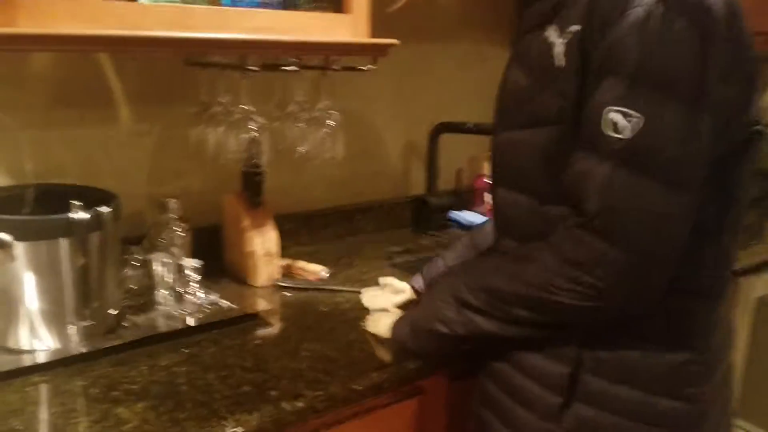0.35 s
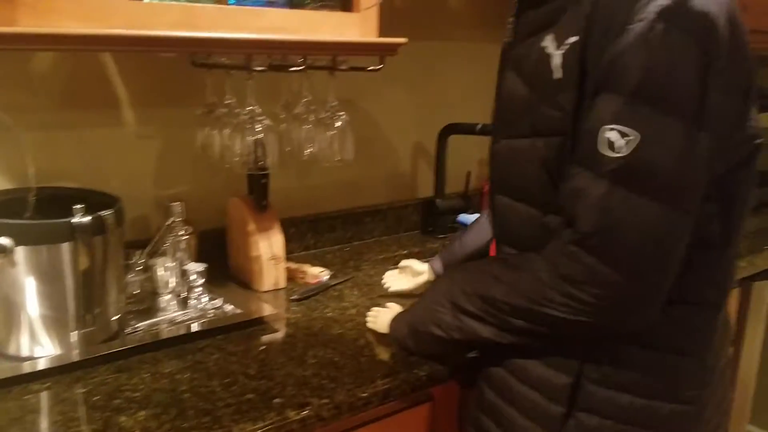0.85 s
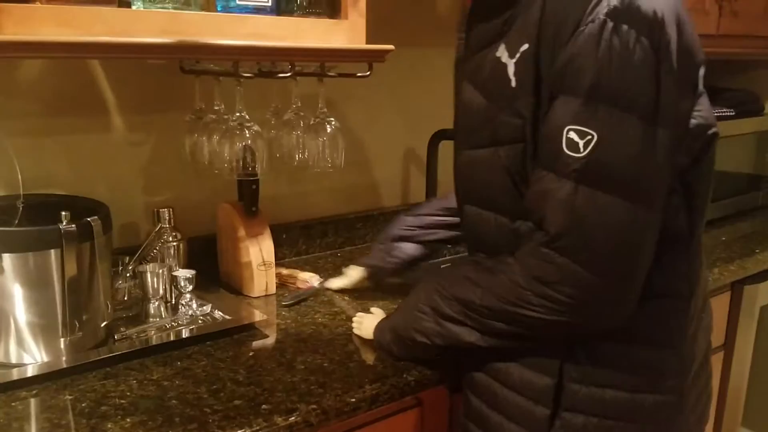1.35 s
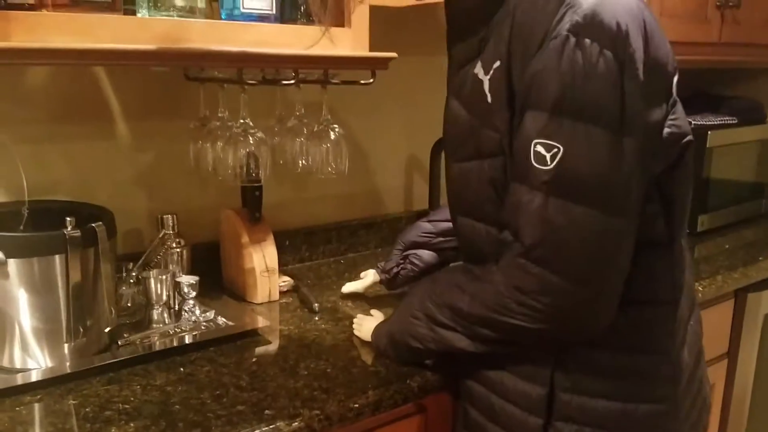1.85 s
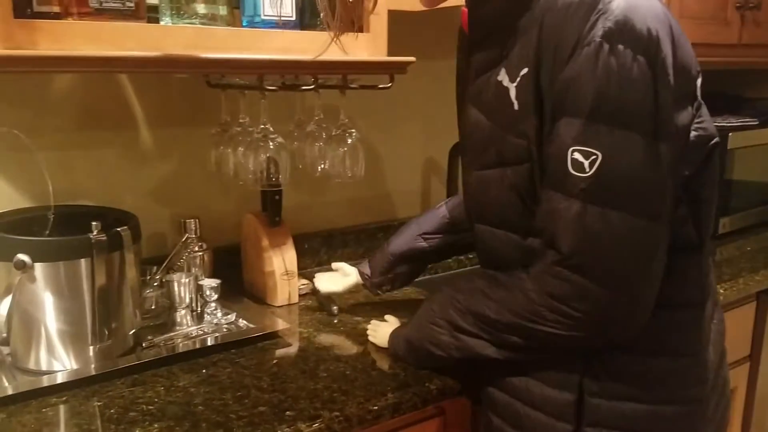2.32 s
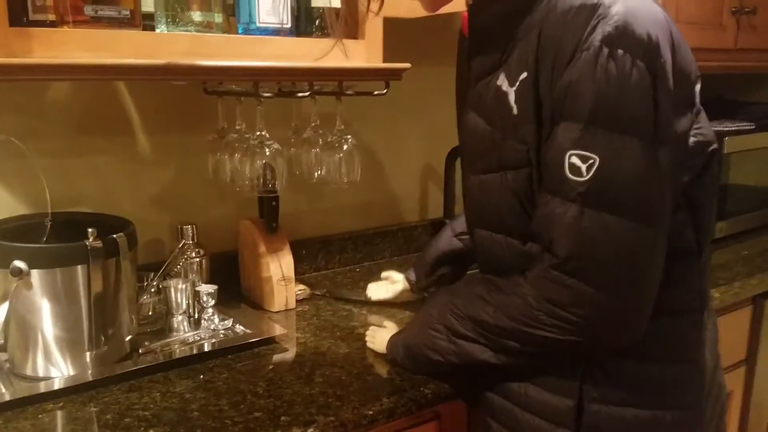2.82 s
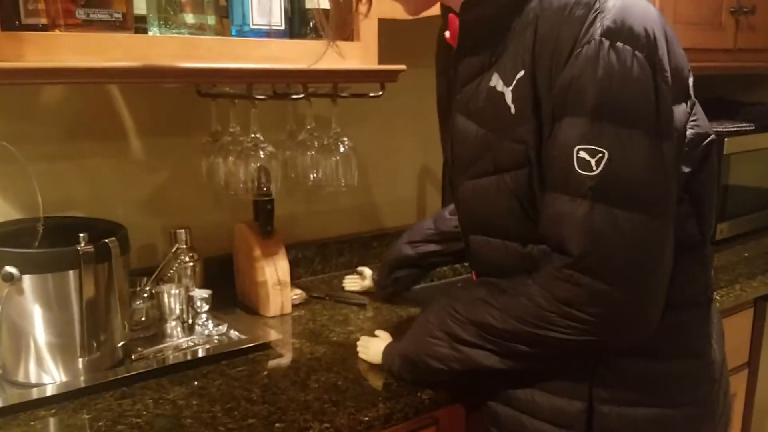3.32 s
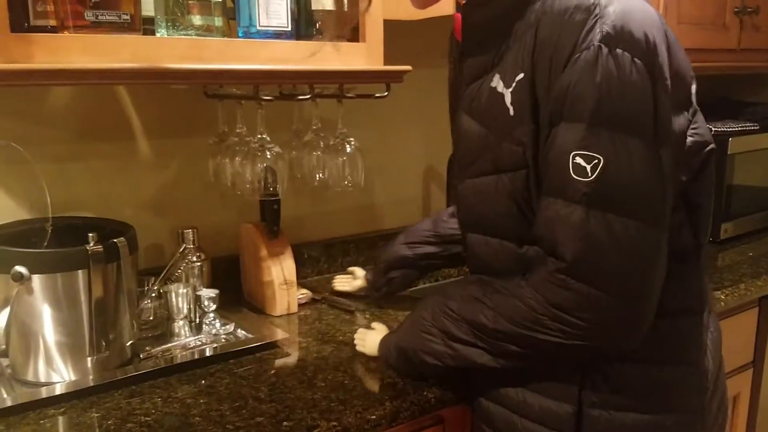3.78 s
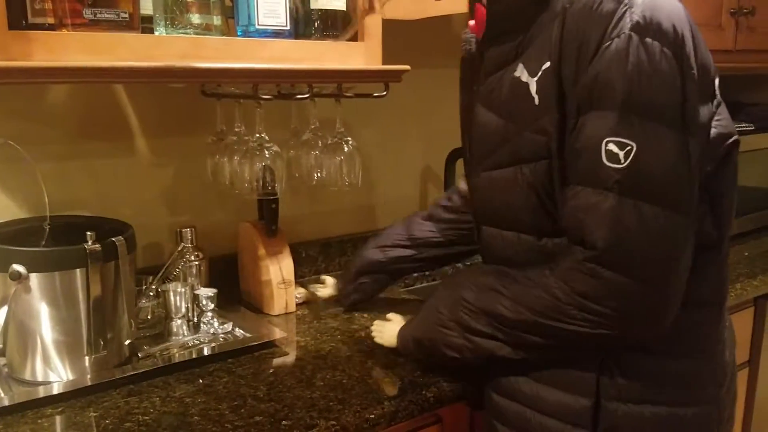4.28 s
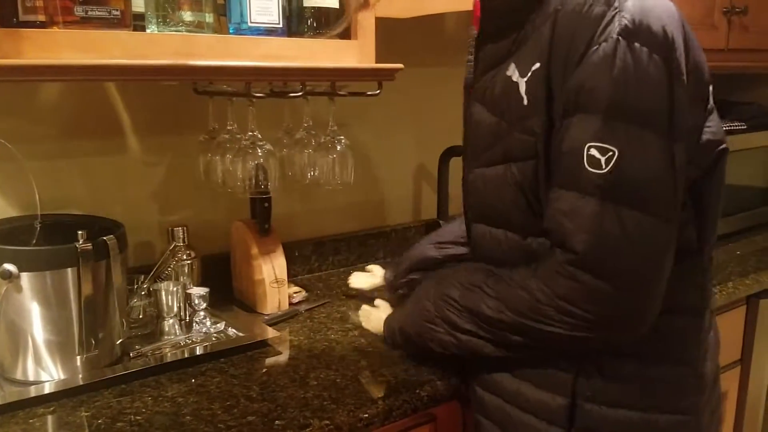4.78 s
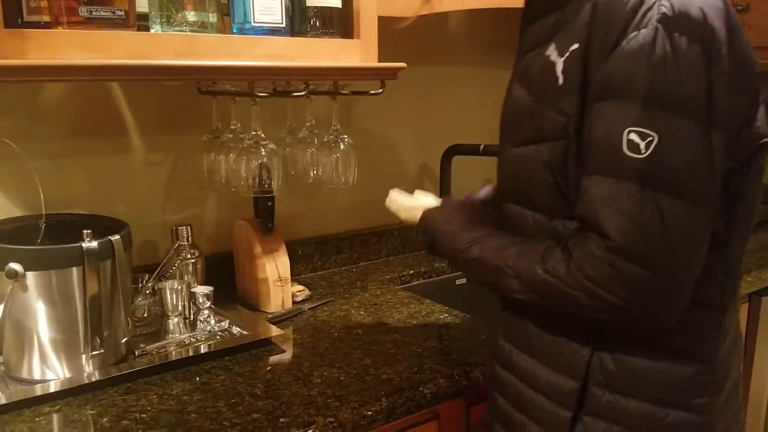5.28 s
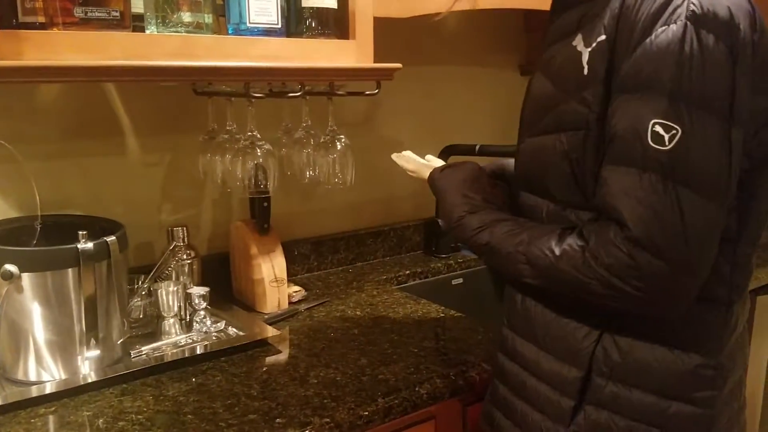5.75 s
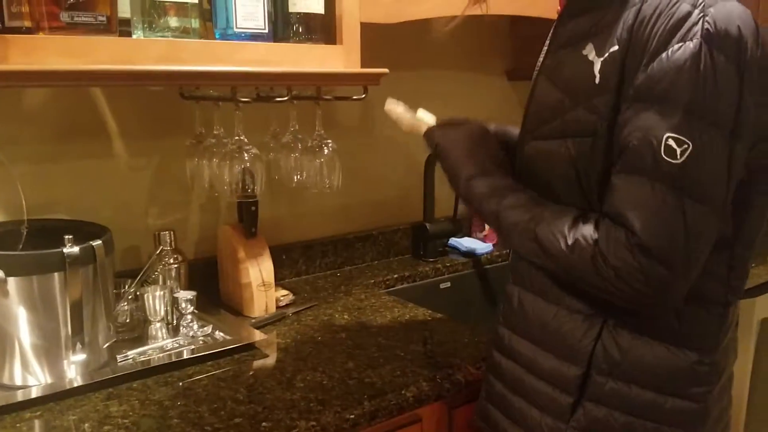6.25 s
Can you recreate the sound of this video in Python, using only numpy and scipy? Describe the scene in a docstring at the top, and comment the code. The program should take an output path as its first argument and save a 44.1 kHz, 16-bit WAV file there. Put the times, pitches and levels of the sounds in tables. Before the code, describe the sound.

Faint room tone and a jacket rustle, then a sharp rattle of steel on stone, scraping and settling. After a pause it clatters again, then twice more with harder knocks, stuttering slides and plastic crackle, the final burst longest and rough. Low bumps travel through the cabinet. It ends in light taps and nylon swishes, heard from a short distance in a lively little room.

```python
"""Quiet kitchen: a knife is nudged about on a stone counter, a couple of metres from a phone.
Each knock is a dying chatter of contacts that rings handle, blade and crackly film; between knocks the knife
slides and catches, driving the same resonances from noise. Cabinet bumps are short damped sines; a nylon sleeve
hisses as swelling filtered noise; a small hard room adds a short noise tail over a faint noise floor."""
import sys
import numpy as np
from scipy import signal
from scipy.fft import rfft, irfft, next_fast_len
from scipy.io import wavfile
from scipy.ndimage import uniform_filter1d

SR = 44100
rng = np.random.default_rng(int(sys.argv[2]) if len(sys.argv) > 2 else 0)


def persist_wave(psi):
    """Save psi, clipped to +-1, as 16-bit WAV."""
    counts = np.round(np.clip(psi, -1, 1) * 32767).astype(np.int16)
    wavfile.write(sys.argv[1], SR, np.atleast_2d(counts).T)


def makeup_ratio(level_db):
    """Linear amplitude ratio for a level in decibels (20 dB per factor of ten)."""
    decades = np.asarray(level_db, float) / 20
    return 10 ** decades


N = 281181
T = np.arange(N) / SR

# knocks, drive of each part: (time [s], blade [dB], then against the blade: main ring [dB],
# film crackle [dB], handle [dB])
KNOCKS = [(0.417, -34.5, 3.5, 17, -9.5), (0.495, -39, -16, -20, 3.5), (0.51, -35.5, -3, -24, 7),
          (0.594, -49.5, 18, 6, 4), (.61, -18, 5, -6.5, 0.5), (.624, -21.5, 8.5, -4, -21),
          (0.655, -24, 7.5, -1, 0), (0.718, -30.5, -4, -9, -9.5), (.744, -41, 10, 3, 2),
          (.764, -30, 5.5, -0.5, -9), (.808, -38, -10, -12, 8), (0.861, -40.5, -20, -17, 10),
          (0.934, -55, -6, -7, 16), (.959, -65, 12, -9, 11), (.998, -65, -13, -4, 19),
          (1.081, -84, -4, -5, 33.5), (1.178, -44, 10, -14.5, 1), (1.223, -55, 7.5, -6, -4.5),
          (1.422, -73, -5, 19, 4), (1.461, -22, 9, -1.5, -6.5), (1.483, -22, -29, 3.5, -10.5),
          (1.511, -26, -9, 4, -12), (1.551, -37.5, 15, 14, 10), (1.596, -24, -20, -2.5, -13.5),
          (1.627, -33.5, 15, -10, 4), (1.653, -37, 12, 1, 8.5), (1.675, -32, -10, -22, 1.5),
          (1.704, -23.5, -7, -14.5, -8.5), (1.736, -43.5, 14.5, -3, 7), (1.767, -39.5, -6, -26, 4),
          (2.477, -22.5, 6, -7.5, -1), (2.514, -21, 8, -4.5, 3), (2.531, -25.5, -10, -16, -1.5),
          (2.545, -18.5, 5.5, -7.5, -0.5), (2.599, -35, 8, -15, -5), (2.692, -63.5, -2, 11, 22.5),
          (2.756, -61, 9, -22, 7), (2.787, -42.5, 0.5, -2, -2), (2.838, -56.5, -1, -22, 18.5),
          (2.883, -46, -10, 7.5, -17), (2.929, -57, 5, 22, -5), (2.938, -26.5, 2.5, 6.5, 2.5),
          (3.013, -63, 28, -4, 13), (3.024, -39.5, -2, 11.5, -20), (3.052, -28, 6, -25, 4),
          (3.07, -28, 1, 0, -2), (3.132, -36.5, 10, -14, -4.5), (3.275, -48.5, 9, -18, 2.5),
          (3.311, -63, 26, -1, 12), (3.357, -64, 1, -6, 24), (3.447, -66.5, 21, -7, 22),
          (3.498, -48, 23, 5.5, 16), (3.52, -15, 7.5, -7, 0), (3.554, -22, -16, -2.5, -6),
          (3.59, -25.5, -26, -1, -9), (3.65, -31.5, -23, -1, -17), (3.674, -39, -26, -12, -28),
          (3.703, -30.5, -19, 5.5, -20), (3.768, -38.5, -5, -18, -2), (3.828, -44.5, -5, -5, -4),
          (3.863, -34.5, -14, 2, -14), (3.915, -56, 0, -2, 11.5), (4.161, -39.5, 5, -17, -2.5),
          (4.185, -59, 21.5, -2, 9.5), (4.221, -73, 12, 14, 10.5), (4.321, -51.5, -1, 9, -16.5),
          (4.357, -19.5, 9, 1, -1), (4.368, -15.5, -3, -20, -10), (4.394, -17, 3, -3, -4.5),
          (4.453, -30, 6, -15, -3), (4.476, -24, 9.5, -7, -13.5), (4.504, -22.5, 2, -9.5, -15.5),
          (4.611, -37, 19.5, -8, 5), (4.626, -19.5, -33, 1, -18.5), (4.658, -46, -19, -7.5, 6),
          (4.69, -26.5, -2, 9, -12), (4.726, -23, 6, -11, -5), (4.802, -36, -22, -13.5, 12),
          (4.857, -46.5, 3, -14, 19), (4.937, -61, 20.5, -8, 24), (4.987, -55, -16.5, -14, 18),
          (5.021, -61, -9, -10, 24.5), (5.088, -77, -0.5, 0, 20.5), (5.357, -53, 19, 8, 1),
          (5.381, -46, 7.5, -9, 1), (5.571, -57.5, -14, -10, -7.5)]
# one list per sliding stroke: (time [s], handle [dB], crackle against handle [dB], favoured handle mode [Hz])
SLIDE = [
    [(.4, -65, 8, 834), (.472, -53, 11, 990), (.594, -48.5, -7.5, 920), (.662, -37, -1.5, 1340),
     (.736, -33, -12, 1230), (.79, -41.5, -22, 1420), (.84, -50.5, -9.5, 1440), (.908, -43, -22, 1480),
     (.94, -59, -27, 790), (.99, -76, -12, 1410), (1.12, -70, 3.5, 1410), (1.21, -68, 5.5, 1240),
     (1.3, -66, 0, 730)],
    [(1.44, -70, 12, 1300), (1.52, -61, 19, 1000), (1.6, -34.5, -14, 1140), (1.65, -32, -13, 1320),
     (1.694, -36.5, -32, 1310), (1.768, -49.5, -12, 1100), (1.82, -60, -6.5, 1006),
     (1.95, -100.5, -0.5, 900)],
    [(2.53, -65, 5, 1180), (2.65, -35.5, -11, 1030), (2.72, -49.5, -25, 850), (2.89, -52.5, -4.5, 950),
     (3.01, -31.5, -19, 960), (3.14, -46, -9, 880), (3.31, -45.5, -5.5, 780), (3.41, -46.5, -9.5, 730),
     (3.5, -44.5, -11, 1140)],
    [(3.56, -46, 13, 1080), (3.68, -68, 21.5, 950), (3.74, -50, 9, 930), (3.78, -47, -17, 975),
     (3.86, -49.5, -10, 930), (3.91, -58.5, -10, 874), (3.99, -59, -14.5, 864), (4.12, -79, -18.5, 1150)],
    [(4.27, -98, 3, 1090), (4.34, -47, -17, 1090), (4.41, -54, 20.5, 1060), (4.52, -29, 5, 1060),
     (4.57, -38, -3, 1040), (4.63, -62.5, 17, 1010), (4.76, -23, -23.5, 1320), (4.84, -43.5, -20, 1420),
     (4.9, -39.5, -27, 1320), (4.97, -51.5, -22, 1060), (5.02, -54.5, -20, 518), (5.12, -91.5, 7, 545)],
]
# the hand: (time [s], grip as dull rattle against clear ringing [dB], favoured blade mode [Hz],
# favoured film mode [Hz])
HAND = [(.4, 4.5, 2470, 12600), (.5, 7.5, 3050, 11000), (.58, -4.5, 2600, 6900), (.74, 0.5, 3030, 7260),
        (.9, -3.5, 2340, 8300), (1.25, 0, 2700, 5840), (1.45, 10, 2600, 8200), (1.54, 12, 3530, 8250),
        (1.78, -6, 2554, 7600), (2.47, -6, 3220, 7600), (2.62, -2.5, 2900, 6400), (2.91, 1, 3450, 9900),
        (3.05, 0.5, 2350, 12000), (3.17, 1, 2650, 6140), (3.45, -1.5, 2720, 6100), (3.72, 14, 3960, 8200),
        (3.78, -4, 2380, 8000), (3.88, 6, 4300, 7700), (4.14, -6, 3020, 6980), (4.4, 6.5, 3290, 8100),
        (4.68, 11.5, 3700, 7000), (4.75, -0.5, 2260, 6500), (4.87, -2, 2450, 8050), (5.02, -12, 2400, 8800),
        (5.35, -1, 3086, 8430)]


def band(x, hz, width_hz):
    """Resonance with gain 1 at its centre."""
    return signal.lfilter(*signal.iirpeak(min(hz, .45 * SR), hz / max(width_hz, 5), fs=SR), x)


def colour(x, points):
    """Gain of (frequency [Hz], level [dB]) points, joined on a log-frequency axis."""
    size = next_fast_len(N)
    hz, db = np.transpose(points)
    bin_hz = np.arange(size // 2 + 1) * SR / size
    gain = makeup_ratio(np.interp(np.log(bin_hz + 1), np.log(hz), db))
    return irfft(rfft(x, size) * gain, size)[..., :N]


def unit(x):
    """Scale to rms 1."""
    return x / np.sqrt(np.mean(x ** 2))


def walk(rate_hz):
    """Normal random levels drawn at rate_hz, joined by straight slews."""
    hold = int(SR / rate_hz)
    levels = np.repeat(rng.standard_normal(N // hold + 1), hold)
    return uniform_filter1d(levels, hold)[:N]


def floor():
    """Room tone and microphone hiss: flickering coloured noise, narrow in the deep bass, wider in the treble."""
    # noise spectrum: (frequency [Hz], relative density [dB per Hz])
    floor_spectrum = [(15, -36), (25, -6.5), (80, -12.5), (97, -15.5), (145, -12.5), (236, -14.5),
                      (263, -15.5), (363, -15), (607, -16.5), (734, -13.5), (1260, -20), (1560, -15.5),
                      (4490, -22.5), (14800, -23), (16000, -22.5)]
    # stereo width: (frequency [Hz], side minus mid [dB])
    side_levels = [(60, -17.5), (110, -33), (200, -4), (380, -8), (700, -7.5), (1290, -10), (2380, -4),
                   (4400, -5.5), (8120, -1), (15000, -5)]
    mid_rms_db, flicker_db, flicker_hz = -66.5, 0.56, 9.8
    mid, side = colour(rng.standard_normal((2, N)), floor_spectrum)
    wide = mid + colour(side, side_levels) * np.array([[1], [-1]])
    return wide / np.std(mid) * makeup_ratio(mid_rms_db + flicker_db * walk(flicker_hz))


def sleeve():
    """Nylon rubbing on nylon: each arm swing swells a bright hiss plus a duller part."""
    # arm swings: (fastest time [s], speeding up [s], slowing down [s], level [dB], duller against bright [dB])
    arm_swings = [(.01, .1, 0.22, -67, -26), (.36, .15, .2, -66, -12.5), (1.15, .04, 0.69, -67.5, -1.5),
                  (2.36, .1, .15, -69.5, -16), (3.3, .25, .25, -70, 10), (4.3, 0.13, .1, -57.5, -14.5),
                  (5.2, .4, 0.44, -61.5, -24.5), (6.34, .14, .2, -56.5, 5)]
    drop_db = 15  # fall of the hiss one rise or fall time from its peak
    bright = band(rng.standard_normal(N), 8100, 1600)
    bright = unit(bright + 0.71 * band(rng.standard_normal(N), 14000, 6000))
    dull = band(rng.standard_normal(N), 1900, 2700)
    dull = unit(dull + 2.7 * band(rng.standard_normal(N), 190, 400))
    hiss = 0
    for s, rise_s, fall_s, db, dull_db in arm_swings:
        away = (T - s) / np.where(T < s, rise_s, fall_s)
        hiss = hiss + makeup_ratio(db - drop_db * away ** 2) * (bright + makeup_ratio(dull_db) * dull)
    return hiss * makeup_ratio(2.4 * walk(24.85))


def grit(per_s, spread_db, hiss):
    """Tiny uneven contacts at random times and signs over some hiss, rms 1."""
    hits = rng.random(N) < per_s / SR
    hits = hits * makeup_ratio(spread_db * rng.uniform(-1, 1, N)) * rng.choice([-1, 1], N)
    return unit(unit(hits) + hiss * rng.standard_normal(N))


def struck(grains):
    """Every knock begins with one firm contact on top of the grains."""
    first_touch = 5  # against the grains' rms
    touch = np.zeros(N)
    touch[(np.transpose(KNOCKS)[0] * SR).astype(int)] = first_touch
    return grains + touch


def contact(part, stumbles, shorter=1):
    """Drive of part 0 handle, 1 ring, 2 blade, 3 film: chatter dying after each knock, plus stumbling slide."""
    # sawing spells: (from [s], to [s])
    sawing_spells = [(1.47, 1.61), (2.47, 2.5), (3.54, 3.57), (4.35, 4.52)]
    chatter_s, sawing_chatter_s = 0.016, 0.027  # decay lying loose, while sawing
    slide_ring_db, slide_blade_db = -11.5, -6  # against the handle; the blade adds half the crackle dB
    force = np.zeros(N)
    after = np.arange(SR // 4) / SR
    for s, blade_db, ring_db, crackle_db, handle_db in KNOCKS:
        sawing = any(a < s < b for a, b in sawing_spells)
        decay_s = shorter * (sawing_chatter_s if sawing else chatter_s)
        drive_db = blade_db + (handle_db, ring_db, 0, crackle_db)[part]
        start = int(s * SR)
        force[start:start + len(after)] += makeup_ratio(drive_db) * np.exp(-after / decay_s)
    for stroke in SLIDE:
        s, handle_db, crackle_db, _ = np.transpose(stroke)
        share_db = (0, slide_ring_db, slide_blade_db + crackle_db / 2, crackle_db)[part]
        drive_db = np.interp(T, s, handle_db + share_db, left=-120, right=-120)
        force += makeup_ratio(drive_db) * stumbles
    return force


def mode(x, hz, width_hz):
    """A resonance with steep skirts."""
    return band(band(x, hz, width_hz), hz, 8 * width_hz)


def body(force, grains, modes, broad, spot_hz, shift_db):
    """Rings one part: modes near the contact spot speak up, each swelling and fading on its own."""
    favour_db = 13.5  # loss per octave from spot_hz at 0 dB grip; a loose grip picks more sharply
    low_hz, high_hz, broad_db = broad
    wide = signal.butter(4, (low_hz, high_hz), "band", fs=SR, output="sos")
    grip = makeup_ratio(np.interp(T, *np.transpose(HAND)[:2]) / 2)  # half lifts the rattle, half lowers the ringing
    # evenly driven part, the level reference
    free = sum(makeup_ratio(db) * mode(grains, hz, width_hz) for hz, width_hz, db in modes)
    free = free + makeup_ratio(broad_db) * signal.sosfilt(wide, grains)
    out = makeup_ratio(broad_db) * signal.sosfilt(wide, force * grip * grains)
    for hz, width_hz, db in modes:
        octaves_off = np.abs(np.log2(hz / spot_hz))
        reach = makeup_ratio(db + shift_db * walk(18) - favour_db / grip * octaves_off)
        out += mode(force / grip * reach * grains, hz, width_hz)
    return out / np.std(free)


def cabinet_rumble(chatter, stumbles):
    """The cabinet rumbles along with the handle: its drive on one low, broad resonance."""
    rumble_db, rumble_hz, width_hz = -24.5, 123, 170
    return makeup_ratio(rumble_db) * contact(0, stumbles) * unit(band(chatter, rumble_hz, width_hz))


def knife():
    """Handle, ring, blade and film share one judder; steel chatters, film crackles in finer grains."""
    # resonances of handle, main ring, blade and film: (centre [Hz], width [Hz], relative level [dB])
    handle_modes = [(450, 60, -10), (530, 40, -5), (670, 60, -8), (800, 40, -4), (950, 40, -4),
                    (1030, 40, -3), (1180, 60, -4), (1265, 50, -3), (1420, 55, -2)]
    ring_modes = [(1690, 70, 0), (1780, 50, -10), (1910, 70, -5), (2070, 60, -12), (2780, 60, -5),
                  (4790, 70, -4)]
    blade_modes = [(2335, 40, 0), (2490, 55, -5), (2950, 55, -2), (3250, 80, -5), (3750, 110, -7),
                   (4360, 100, -7), (4790, 80, -8)]
    film_modes = [(5520, 200, -0.5), (6500, 250, 9.5), (8016, 1700, 12), (10350, 980, -5),
                  (10300, 1200, -6.5), (13360, 1100, 8.5), (15000, 450, 1)]
    # broad noisy part under each set: (from [Hz], to [Hz], level [dB])
    handle_broad, ring_broad = (390, 1600, -14), (1450, 2300, -20)
    blade_broad, film_broad = (1900, 5000, -18), (5000, 15800, -6)
    ring_up_per_db = 0.02  # octaves the favoured main ring climbs per dB of firm grip
    catches_per_s, catch_decay_s = 35, .006
    film_shorter = 0.77  # crackle decay against steel chatter

    judder = makeup_ratio(0.29 * walk(99))
    chatter = struck(grit(1100, spread_db=4, hiss=0.64))
    crackle = struck(grit(2000, spread_db=1.5, hiss=0.51))
    # the slide catches at random
    catches = (rng.random(N) < catches_per_s / SR) * rng.exponential(size=N)
    stumbles = 1 + signal.lfilter([1], [1, -np.exp(-1 / (catch_decay_s * SR))], catches)

    slide_s, _, _, slide_hz = np.concatenate(SLIDE).T
    handle_hz = np.interp(T, slide_s, slide_hz)
    hand_s, grip_db, blade_spot_hz, film_spot_hz = np.transpose(HAND)
    firm_db = np.maximum(np.interp(T, hand_s, grip_db), 0)
    ring_hz = ring_modes[0][0] * 2 ** (ring_up_per_db * firm_db)
    blade_hz = np.interp(T, hand_s, blade_spot_hz)
    film_hz = np.interp(T, hand_s, film_spot_hz)

    handle = body(contact(0, stumbles) * judder, chatter, handle_modes, handle_broad, handle_hz, shift_db=3.5)
    ring = body(contact(1, stumbles) * judder, chatter, ring_modes, ring_broad, ring_hz, shift_db=1.5)
    blade = body(contact(2, stumbles) * judder, chatter, blade_modes, blade_broad, blade_hz, shift_db=3.5)
    film_force = contact(3, stumbles, film_shorter) * judder
    film = body(film_force, crackle, film_modes, film_broad, film_hz, shift_db=2.2)
    return handle + ring + blade + film + cabinet_rumble(chatter, stumbles)


def counter():
    """Soft pushes make the cabinet under the stone thud: three damped sines per push."""
    # bumps carried by the counter: (time [s], push [dB])
    soft_bumps = [(0.421, -44), (0.625, -56), (1.194, -48), (1.459, -51.5), (1.631, -59), (2.495, -63),
                  (2.547, -58), (2.773, -52), (2.904, -50.5), (2.958, -45), (3.523, -36), (4.16, -48.5),
                  (4.356, -38), (4.52, -52), (4.73, -33), (4.794, -39.5), (5.387, -49), (6.002, -58)]
    push = np.zeros(N)
    for s, db in soft_bumps:
        push[int(s * SR)] = makeup_ratio(db)
    after = np.arange(SR // 5) / SR
    envelope = (1 - np.exp(-after / 0.0036)) * np.exp(-after / 0.017)
    thud = sum(envelope * np.sin(2 * np.pi * hz * after) for hz in (150, 205, 280))
    return signal.fftconvolve(push, thud)[:N]


def room(x):
    """Dense echoes of hard walls as decaying noise; the treble dies first."""
    t60_s, treble_t60_s, tail_db = 0.25, 0.13, -12.5
    after = np.arange(SR // 2) / SR
    noise = rng.standard_normal(len(after)) * np.clip(after / 0.018, 0, 1)
    bass = signal.lfilter(*signal.butter(1, 2500, fs=SR), noise)
    treble = noise - bass
    tail = bass * 1000 ** (-after / t60_s) + treble * 1000 ** (-after / treble_t60_s)
    return x + makeup_ratio(tail_db) * signal.fftconvolve(x, tail / np.linalg.norm(tail))[:N]


def scene():
    """Sounds in the room reach two ports that pass little bass; the left is shaded in the upper mids."""
    # port balance: (frequency [Hz], left minus right [dB])
    port_balance = [(300, 0), (700, -.6), (1300, -1), (2400, -2), (4000, -4.2), (6000, -4.5), (7500, -2.5),
                    (9000, 1.5), (10000, 0), (11000, 0)]
    heard = room(knife() + counter() + sleeve())
    heard = signal.sosfilt(signal.butter(3, 115, "high", fs=SR, output="sos"), heard)
    hz, db = np.transpose(port_balance)
    left = colour(heard, np.c_[hz, db / 2])
    right = colour(heard, np.c_[hz, -db / 2])
    return np.array([left, right]) + floor()


def low_pass(x):
    """Removes everything above the highest recorded frequency."""
    return signal.sosfilt(signal.butter(12, 16650, fs=SR, output="sos"), x)


def record(dry):
    """The phone rounds the loudest peaks, cuts the top and carries a small constant offset."""
    top_hz, offset = 15600, -.0016
    rounded = np.tanh(1.2 * dry) / 1.2
    cut = signal.sosfilt(signal.ellip(10, .2, 60, top_hz, fs=SR, output="sos"), rounded)
    return low_pass(cut + offset)


dry = scene()
out = record(dry)
persist_wave(out)
```